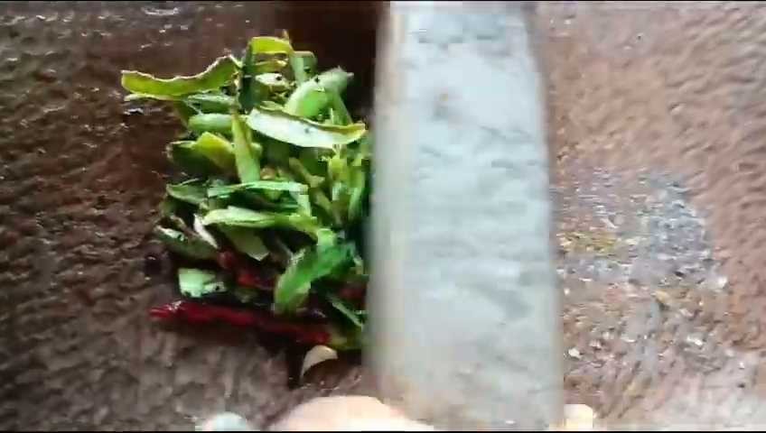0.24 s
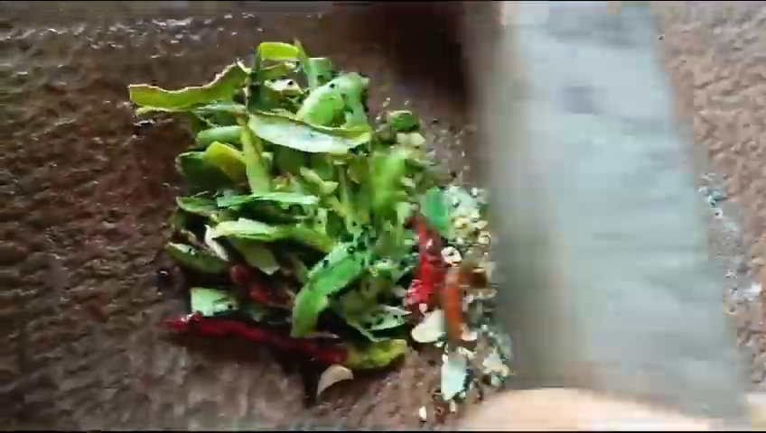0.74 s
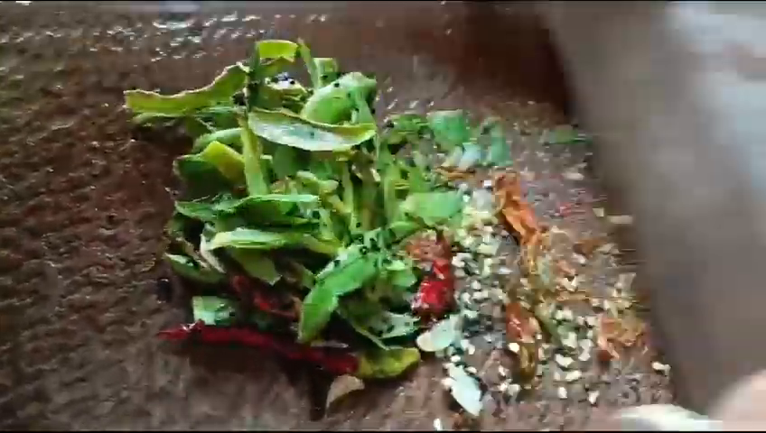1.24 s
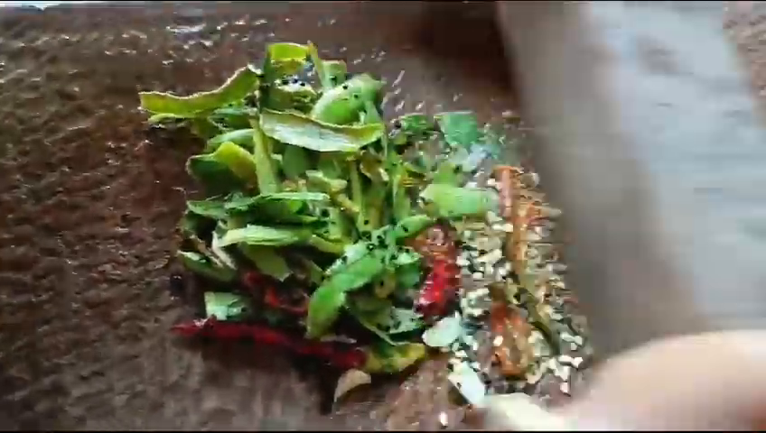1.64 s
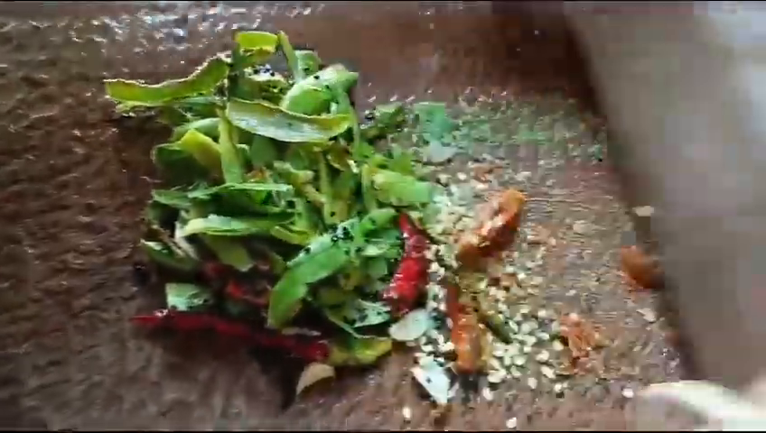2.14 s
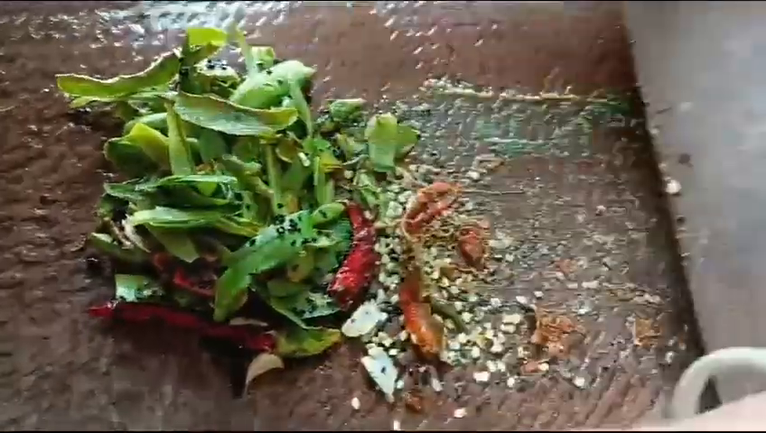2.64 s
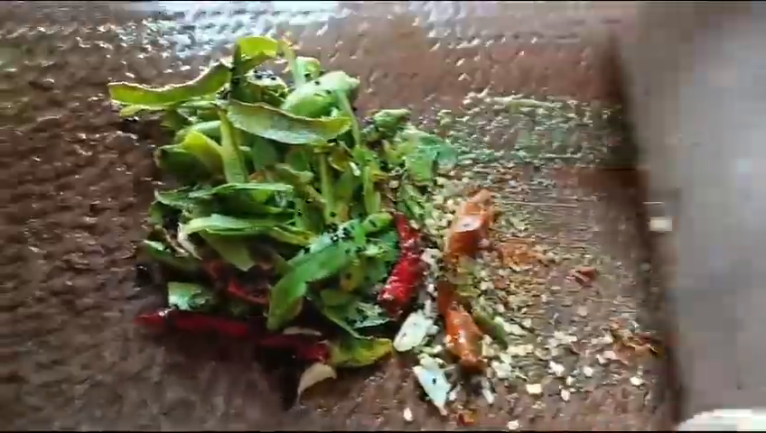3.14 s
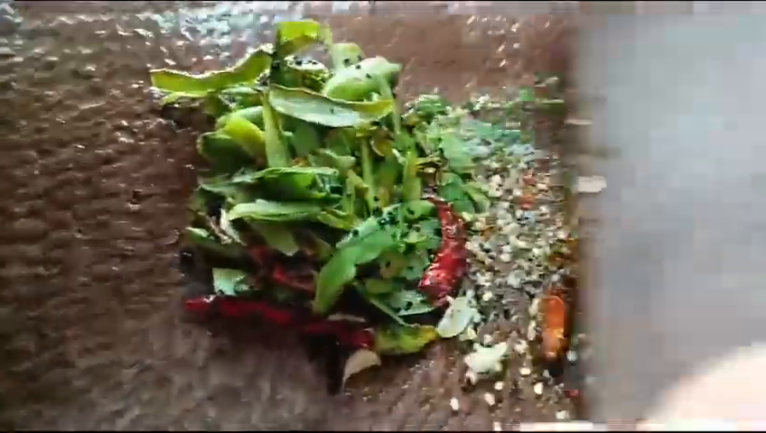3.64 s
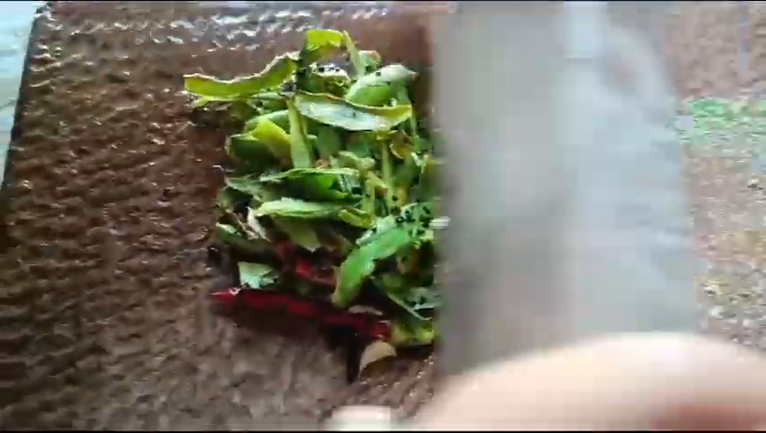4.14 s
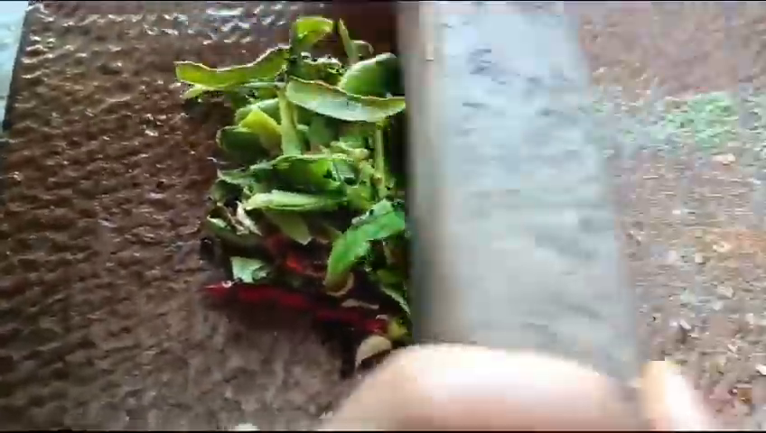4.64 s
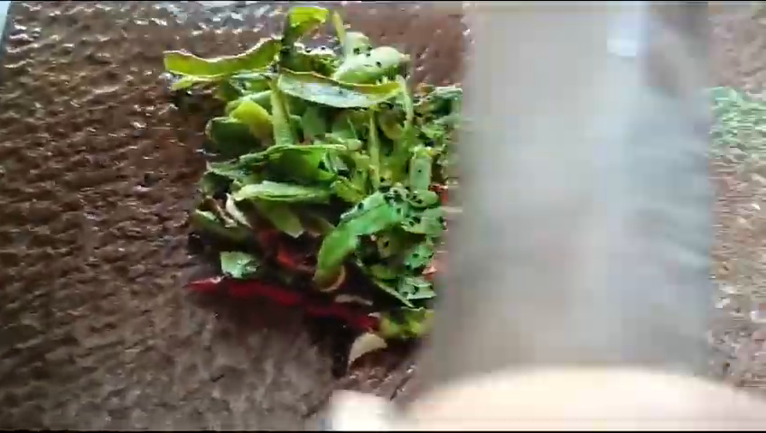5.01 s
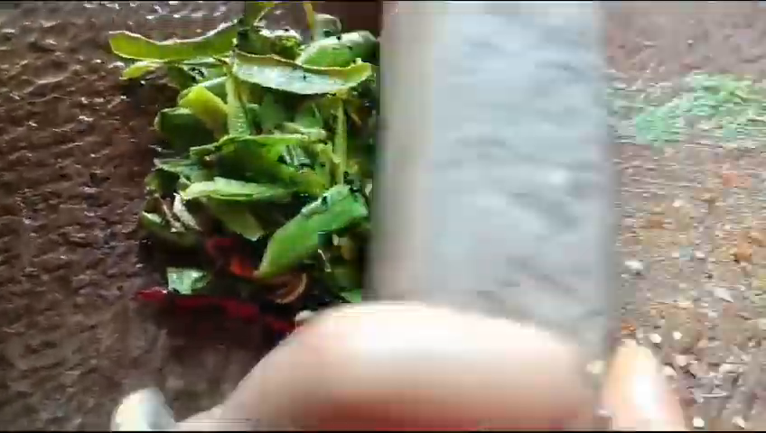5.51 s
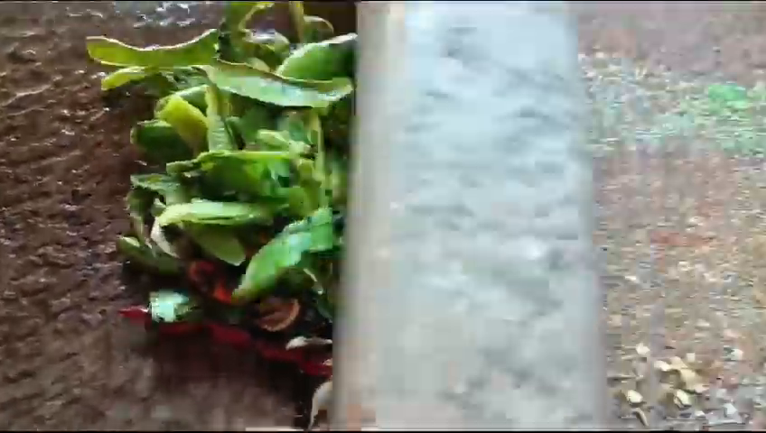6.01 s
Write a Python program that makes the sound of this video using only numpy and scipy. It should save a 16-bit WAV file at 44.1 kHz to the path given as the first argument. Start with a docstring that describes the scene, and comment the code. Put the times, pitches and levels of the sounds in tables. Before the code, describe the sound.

Close in a small hard-walled kitchen, a heavy stone roller works over a slab about every 0.45 seconds. Each push gives a hollow, crunchy grind with low rumble, fine crackle and small stone knocks; a brief scuff follows, then a lighter, hissing slide back over grit. Faint metallic clinks, perhaps bangles, precede many pushes. One much harder stone knock lands near the end. Close stereo microphone, short room tail.

```python
"""Small kitchen, close by: a stone roller grinds seeds, chillies and leaves on a slab, over two strokes a second.
Each push grinds, rumbles, crackles and knocks: random fractures, noise and blows shaped by stone modes.
The roller scuffs as it turns, then slides back over the grit with a hiss of tiny noise bursts; dry husks snap.
Something small and metallic, perhaps bangles on the wrist, clinks as decaying bands of noise.
A short tail from hard walls lies behind everything."""
import sys
import numpy as np
from scipy import signal
from scipy.fft import rfft, irfft
from scipy.io import wavfile
from scipy.ndimage import uniform_filter1d

SR = 44100
rng = np.random.default_rng(int(sys.argv[2]) if len(sys.argv) > 2 else 0)


def dump(signal):
    """Clip the signal to [-1, 1] and save it as 16-bit WAV at the path in sys.argv[1]."""
    limited = np.clip(np.atleast_2d(signal).T, -1, 1)
    pcm = np.round(limited * 32767).astype(np.int16)
    wavfile.write(sys.argv[1], SR, pcm)


N = 276507
TIME = np.arange(N) / SR
START_S, EDGE_HZ = 0.115, 15800
SCUFF_HELD_S, EASE_S = 0.012, 0.022

# push over the spices: full_force_s, held_s, grind_db, rumble_db, crackle_db, hiss_db
PUSH_STROKES = [(0.246, 0.074, -31, -34, -40.5, -58.5), (0.676, 0.055, -29.5, -33, -40.5, -55.5),
                (1.133, 0.055, -34.5, -32, -40, -54), (1.597, 0.051, -33, -32.5, -39.5, -56.5),
                (2.021, 0.056, -32.5, -33, -38, -57.5), (2.488, 0.033, -33.5, -32, -35.0, -56.5),
                (2.914, 0.078, -32, -32.5, -39, -62), (3.362, 0.03, -28, -32, -39.5, -52.5),
                (3.799, 0.051, -34.5, -32.5, -38, -56.5), (4.262, 0.041, -27.5, -29, -37, -50),
                (4.682, 0.055, -35.0, -32, -45, -53), (5.1, 0.075, -34.5, -30, -44, -51.5),
                (5.556, 0.086, -40, -36.0, -48, -58), (6.053, 0.03, -28.5, -30, -38.5, -48.5)]
# turn at the far end: start_s, crackle_db, hiss_db
TURN_SCUFFS = [(0.364, -52, -50), (0.795, -44, -54), (1.231, -37.5, -48), (1.681, -47, -49),
               (2.13, -36.5, -57), (2.581, -43.5, -49), (3.012, -49, -43), (3.449, -42, -48.5),
               (3.892, -45, -48.5), (4.352, -39, -46), (4.787, -41, -42.5), (5.208, -47, -42.5),
               (5.68, -36, -38), (6.146, -34.5, -37)]
# pull back over the grit: full_speed_s, held_s, grind_db, rumble_db, hiss_db
PULL_STROKES = [(0.433, 0.099, -36.5, -40, -40), (0.87, 0.11, -53, -45, -38.5),
                (1.303, 0.12, -35.5, -44, -40), (1.756, 0.12, -36, -41, -41.5),
                (2.197, 0.14, -33, -44.5, -42), (2.648, 0.15, -38.5, -43, -43),
                (3.083, 0.14, -40, -43.5, -42.5), (3.523, 0.14, -35, -43.5, -40.5),
                (3.971, 0.13, -36, -42.5, -42.0), (4.418, 0.12, -35.5, -41, -35),
                (4.861, 0.12, -40.5, -41.5, -37.0), (5.294, 0.144, -39, -40, -36),
                (5.759, 0.13, -39, -41, -36), (6.2, 0.091, -39, -41.5, -35.5)]
# layer envelopes per movement: rise_db_per_s, sag_db_per_s (negative grows), fall_db_per_s
PUSH_ENVELOPES = {"grind": (234, 12, 250), "rumble": (237, 12, 171), "crackle": (290, 4.1, 620),
                  "hiss": (214, -101, 270)}
SCUFF_ENVELOPES = {"crackle": (980, 60, 1300), "hiss": (2000, 68, 310)}
PULL_ENVELOPES = {"grind": (290, 41, 530), "rumble": (510, -34, 380), "hiss": (560, 69.3, 690)}
# layer floor, the roller never quite rests: level_db
REST_LEVELS = {"grind": -70, "rumble": -51.5, "crackle": -63, "hiss": -65}


def strokes():
    """Push, scuff and pull add in power over the resting floor; the arms round off every change of force."""
    power = {layer: amp(db) ** 2 for layer, db in REST_LEVELS.items()}
    scuffs = [(s, SCUFF_HELD_S, *levels_db) for s, *levels_db in TURN_SCUFFS]
    phases = [(PUSH_STROKES, PUSH_ENVELOPES), (scuffs, SCUFF_ENVELOPES), (PULL_STROKES, PULL_ENVELOPES)]
    for movements, envelopes in phases:
        for full_s, held_s, *levels_db in movements:
            for layer, db in zip(envelopes, levels_db):
                power[layer] = power[layer] + swell(full_s, held_s, db, envelopes[layer])
    ease = max(round(EASE_S * SR), 1)
    return {layer: uniform_filter1d(10 * np.log10(p), ease) for layer, p in power.items()}


def swell(full_s, held_s, db, envelope):
    """Power of one movement: it rises, sags or grows while held, and falls."""
    rise, sag, fall = envelope
    age_s = TIME - full_s
    drop_db = rise * np.maximum(-age_s, 0)
    drop_db = drop_db + sag * np.clip(age_s, 0, held_s)
    drop_db = drop_db + fall * np.maximum(age_s - held_s, 0)
    return amp(db - np.minimum(drop_db, 100)) ** 2


def travel():
    """Roller position: 1 at the far end at each scuff, 0 by the hands after each pull."""
    ends_s = []
    for scuff, pull in zip(TURN_SCUFFS, PULL_STROKES):
        ends_s += [scuff[0], pull[0] + pull[1]]
    half_turns = np.interp(TIME, [START_S] + ends_s, np.arange(len(ends_s) + 1))
    return np.sin(np.pi * half_turns / 2) ** 2


# modes of roller and slab, also rung by knocks: pitch_hz, width_hz, level_db, left_minus_right_db, left_lead_rad
STONE_MODES = [(216, 33, -7.5, -6, 0), (285, 71, -11.5, -8, 3.5), (397.6, 66, -8.5, -15, 1),
               (530, 39, -12, 14.5, 3.5), (640, 120, -17.5, 19, 0.5), (866.5, 93, 0, -4, 1),
               (911.5, 133, -1.5, -10.5, -1), (1016, 267, -6.5, 9, -2.5), (1090, 320, -10, 9.5, 0.4),
               (1334, 328, -9.5, 3.5, 1), (1567, 66, -12.5, 4, 3), (2054, 160, -10, 5, -0.1),
               (2190, 170, -13, 0, 1.74)]


def grinding(grind_db, level_db=-3, across=0.084):
    """Seeds crumble unevenly under the roller and ring both stones."""
    crush = grains(per_s=1400, spread_db=5.5) * amp(2 * wander(rate_hz=25))
    crush = crush + across * rng.standard_normal((2, N))  # separate noise at each ear
    return evened(through(crush, ring(STONE_MODES))) * amp(grind_db + level_db)


# rumble spectrum: pitch_hz, density_db_per_hz
RUMBLE_SPECTRUM = [(25, -8), (50, -37), (80, -13.5), (120, -7.5), (165, -2), (240, -1.5), (350, 2),
                   (460, -11.5), (650, -11.5), (1200, -50.5)]
# left-right likeness of the rumble: pitch_hz, correlation
RUMBLE_LIKENESS = [(50, 0.94), (180, 0.83), (240, 1), (300, -0.65), (390, 0.35), (470, 0.7)]


def rumble(rumble_db, level_db=-3.5, lumps_db=2, cushioned_db=-4, bare_db=3, deep_hz=150):
    """The heavy roller rides the pitted slab and shakes what it stands on, deeper as the spices flatten."""
    left, other = rfft(rng.standard_normal((2, N)))
    alike = np.clip(read(RUMBLE_LIKENESS, np.fft.rfftfreq(N, 1 / SR)), -1, 1)
    right = alike * left + np.sqrt(1 - alike ** 2) * other
    pair = irfft([left, right], N)
    shake = evened(colour(pair, RUMBLE_SPECTRUM) * amp(lumps_db * wander(rate_hz=35)))
    return drift(shake, deep_hz, cushioned_db, bare_db) * amp(rumble_db + level_db)


# high modes of the roller: pitch_hz, width_hz, level_db
ROLLER_MODES = [(1220, 740, -6), (1990, 96, -33), (2730, 430, -6.5), (3190, 73, 3.5), (3600, 230, -8),
                (4066, 79, 2), (5030, 250, -17)]


def crackle(crackle_db, level_db=0):
    """Husks break and ring the roller's high modes, a little stronger on the left."""
    hz = np.fft.rfftfreq(N, 1 / SR)
    power = sum(amp(db) ** 2 / (1 + ((hz - f) / width) ** 2) ** 2 for f, width, db in ROLLER_MODES)
    husks = sandy(per_s=720, spread_db=4.0, decay_s=0.0012) * amp(1.2 * wander(rate_hz=63))
    rung = patchy(irfft(rfft(husks) * np.sqrt(power), N), depth_db=1.7)
    return evened(rung) * amp(crackle_db + level_db) * amp([[1.5], [-1.5]])


# grit hiss spectrum: pitch_hz, density_db_per_hz
HISS_SPECTRUM = [(500, -14), (1200, -6.5), (1750, -11), (2080, -1), (2500, -6.5), (3100, -4), (3900, 3),
                 (4800, -2.5), (6000, -7.5), (7800, -13), (9300, -7), (11000, -16.5), (13000, -23),
                 (15600, -15.5)]


def sliding(hiss_db, reach, level_db=8.0, flutter_db=1, coarse_db=2, fine_db=-6.5, split_hz=5500,
            echo=0.06, near_s=0.000282, far_s=0.000614):
    """Grit drags between the stones; as it is ground finer the lower part of its hiss fades."""
    grit = sandy(per_s=6000, spread_db=0.5, decay_s=0.00031) * amp(flutter_db * wander(rate_hz=27))
    hiss = patchy(colour(grit, HISS_SPECTRUM), depth_db=2.5)
    # slab reflection lags more as the roller moves away, sweeping the colour
    earlier_s = TIME - near_s - (far_s - near_s) * reach
    reflection = np.array([np.interp(earlier_s, TIME, ear) for ear in hiss])
    hiss = evened(hiss + echo * reflection)
    return drift(hiss, split_hz, coarse_db, fine_db) * amp(hiss_db + level_db)


# roller drops off a seed onto the slab, or once rebounds dully after the heavy blow: start_s, level_db, top_hz
# (hardness of contact)
SEED_KNOCKS = [(0.122, -23, 1150), (0.209, -28, 1110), (0.224, -27, 1670), (0.2341, -17.5, 1340),
               (0.2585, -13.5, 1080), (0.3077, -13.5, 1330), (0.398, -27.5, 1300), (0.4399, -23.5, 1530),
               (0.471, -17, 2100), (0.4829, -20, 1580), (0.653, -18, 1400), (0.6822, -24, 1610),
               (0.7074, -20, 1830), (0.724, -23, 1270), (0.976, -23.5, 1240), (1.1254, -19.5, 1350),
               (1.1657, -19.5, 1320), (1.1703, -20, 1460), (1.1966, -24.5, 1280), (1.2477, -22, 1390),
               (1.3014, -18.5, 1290), (1.5849, -28, 1860), (1.61, -15.5, 1290), (1.6174, -23, 1110),
               (1.6412, -10.5, 1150), (1.7247, -29.5, 1360), (1.8281, -15.5, 1690), (1.8428, -23, 1540),
               (1.9865, -23, 1220), (2.015, -18, 1490), (2.0245, -21.5, 1680), (2.0511, -16.5, 1650),
               (2.059, -18, 1940), (2.0736, -25, 1760), (2.4556, -26, 1530), (2.479, -22, 1140),
               (2.4901, -17.5, 1120), (2.5151, -14, 1590), (2.789, -28.5, 1180), (2.884, -19.5, 1110),
               (2.925, -23, 1220), (3.1416, -28, 1920), (3.1607, -19.3, 1530), (3.349, -17.5, 1160),
               (3.3555, -17.5, 1160), (3.3693, -19.5, 1830), (3.3904, -18, 1540), (3.4057, -21, 1880),
               (3.7835, -25, 1500), (3.7969, -20.5, 1060), (3.8112, -21, 1500), (3.9118, -24, 1280),
               (4.0415, -20, 1170), (4.2297, -16, 1320), (4.2448, -15.5, 1240), (4.2598, -17, 1120),
               (4.2722, -16.5, 1440), (4.2913, -19, 1090), (4.3061, -17.5, 1050), (4.4051, -25, 1400),
               (4.5072, -22.5, 1950), (4.701, -19, 1270), (4.789, -27.5, 1220), (5.0548, -26.5, 1980),
               (5.089, -20, 1530), (5.1017, -21, 1080), (5.118, -20.5, 1050), (5.1266, -22, 1240),
               (5.248, -1.5, 2120), (5.254, -21.5, 523), (5.5327, -17, 1050), (5.546, -13, 1080),
               (6.0365, -20.5, 1640), (6.052, -13.5, 1460), (6.0594, -15.5, 1100), (6.0698, -11.5, 1120),
               (6.0953, -19.5, 1170), (6.1929, -26, 1260)]


def knocks(level_db=2, detune=0.023, vary_db=3.5, damping_hz=110, thin_db=5):
    """Stone meets stone, each time at another spot; crushed spice cushions the blow and takes off its top."""
    out = np.zeros((2, N))
    for start_s, db, top_hz in SEED_KNOCKS:
        modes = np.array(STONE_MODES, float)
        modes[:, 0] *= 1 + detune * rng.standard_normal(len(modes))
        # heavy blow: damps the longest rings, favours high modes
        modes[:, 1] = np.hypot(modes[:, 1], damping_hz * amp(db))
        modes[:, 2] += thin_db * amp(db) * np.log2(modes[:, 0] / 800)
        # light blow: rings modes less evenly
        modes[:, 2] += vary_db * max(1 - amp(db), 0) * rng.standard_normal(len(modes))
        cushion = signal.butter(4, top_hz, fs=SR, output="sos")
        blow = signal.sosfilt(cushion, ring(modes))
        add(out, start_s, blow * amp(db + level_db) / abs(blow).max())
    return out


# dry seed or husk snaps: start_s, level_db
HUSK_SNAPS = [(0.3673, -31.5), (0.7836, -36), (0.8102, -25.5), (2.128, -29.5), (2.138, -27.5),
              (3.0071, -44), (4.359, -28.5), (4.7985, -25), (5.164, -31.5), (5.681, -40), (5.8212, -28),
              (6.1526, -22)]


def snaps(level_db=1, decay_s=0.0044):
    """A husk splits: a bright noise burst that dies within milliseconds."""
    out, t = np.zeros((2, N)), np.arange(1024) / SR
    for start_s, db in HUSK_SNAPS:
        crack = rng.standard_normal((2, len(t))) * np.exp(-t / decay_s)
        crack = colour(crack, [(700, -28), (2200, 5.5), (4000, 8.5), (11000, -2.5), (15000, -22)])
        add(out, start_s, crack * amp(db + level_db) / abs(crack.mean(0)).max())
    return out


# bangles touch: start_s, level_db
BANGLE_CLINKS = [(0.163, -33.5), (0.605, -33.5), (0.643, -34.5), (1.0316, -32.5), (1.059, -32), (1.49, -34),
                 (1.5144, -33.5), (1.914, -36), (1.9477, -42), (2.3764, -33), (2.8076, -35), (2.832, -39.5),
                 (3.2532, -34), (3.707, -29), (4.142, -36), (4.582, -34), (4.6034, -33.5), (5.0228, -36)]
# bangle modes: pitch_hz, level_db, t60_s
BANGLE_MODES = [(2340, -3.5, 0.13), (3980, -3, 0.017), (6470, 5.5, 0.11), (7200, -12.5, 0.077),
                (6900, -26, .06), (9100, 2, 0.058), (11660, -0.5, 0.088), (14640, 4, 0.056)]


def clinks(level_db=-1, tick=1.76, tick_s=0.0093, rise_s=0.00092, chatter_hz=160):
    """Thin rings touch with a tick and chatter briefly against each other, damped by the arm."""
    out, t = np.zeros((2, N)), np.arange(8192) / SR
    hz, mode_db, t60_s = np.transpose(BANGLE_MODES)[:, :, None]
    bins_hz = np.fft.rfftfreq(len(t), 1 / SR)
    for start_s, db in BANGLE_CLINKS:
        # chatter spreads each mode into a narrow noise band
        bands = rfft(rng.standard_normal((2, len(hz), len(t))))
        bands = bands / (1 + ((bins_hz - hz) / chatter_hz) ** 2)
        shares_db = mode_db + 3 * rng.standard_normal(mode_db.shape)
        tone = (evened(irfft(bands)) * amp(shares_db - 60 * t / t60_s)).sum(1)
        touch = rng.standard_normal((2, len(t))) * np.exp(-t / tick_s)
        touch = colour(touch, [(1000, -8), (3000, 8), (7000, 8.5), (14000, 4.5)])
        clink = (tone + tick * touch) * (1 - np.exp(-t / rise_s))
        add(out, start_s, clink * amp(db + level_db) / abs(clink.mean(0)).max())
    return out


# room decay: pitch_hz, t60_s
KITCHEN_DECAY = [(150, 0.21), (900, 0.22), (4000, 0.083), (15000, 0.32)]


def kitchen(x, gap_s=0.006):
    """A short tail from hard walls, each band dying at its own speed."""
    taps = rng.standard_normal((2, SR // 2)) * (TIME[:SR // 2] > gap_s)
    hz, t, z = signal.stft(taps, SR, nperseg=256)
    decay_db = -60 * t / read(KITCHEN_DECAY, hz)[:, None]
    tail = signal.istft(z * amp(decay_db), SR)[1]
    return through(x, tail / np.linalg.norm(tail[0]))


def grains(per_s, spread_db):
    """Tiny fractures at random moments: many small, a few large."""
    size = amp(spread_db * np.minimum(rng.exponential(1, N), 4))
    struck = rng.random(N) < per_s / SR
    return evened(size * rng.choice([-1, 1], N) * struck)


def sandy(per_s, spread_db, decay_s):
    """Each grain is a brief burst, scattered by slab and hands so that it differs at the two ears."""
    keep = np.exp(-2 / (decay_s * SR))
    power = signal.lfilter([1 - keep], [1, -keep], grains(per_s, spread_db) ** 2)
    return np.sqrt(power) * rng.standard_normal((2, N))


def patchy(x, depth_db):
    """The contact keeps changing, so patches of the spectrum come and go."""
    z = signal.stft(x, nperseg=512)[2]
    field = uniform_filter1d(rng.standard_normal(z.shape[1:]), size=9, axis=0)
    field = uniform_filter1d(field, size=6, axis=1)
    return signal.istft(z * amp(depth_db * evened(field)))[1][:, :N]


def ring(modes):
    """Stereo response of well-damped modes; each swells briefly and dies."""
    t = np.arange(4096) / SR
    ear, out = np.array([[.5], [-.5]]), 0
    for hz, width_hz, db, left_db, lead_rad in modes:
        age = np.pi * width_hz * t
        envelope = width_hz * age * np.exp(-age)
        tone = np.sin(2 * np.pi * hz * t + ear * lead_rad)
        out = out + amp(db + ear * left_db) * envelope * tone
    return out


def wander(rate_hz):
    """Slow random signal of rms 1 with little faster than rate_hz."""
    hz = np.fft.rfftfreq(N, 1 / SR)
    return evened(irfft(rfft(rng.standard_normal(N)) / (1 + (hz / rate_hz) ** 2), N))


def drift(x, split_hz, first_db, last_db):
    """The part of x below split_hz changes steadily in level from first_db to last_db."""
    low = signal.sosfiltfilt(signal.butter(2, split_hz, fs=SR, output="sos"), x)
    return x - low + low * amp(np.interp(TIME, [0, TIME[-1]], [first_db, last_db]))


def colour(x, spectrum):
    """Filters x by the spectrum's gain in dB."""
    size = x.shape[-1]
    return irfft(rfft(x) * amp(read(spectrum, np.fft.rfftfreq(size, 1 / SR))), size)


def through(x, response):
    """Convolves x with a stereo response."""
    return signal.oaconvolve(np.atleast_2d(x), response, axes=1)[:, :N]


def add(mix, start_s, sound):
    """Lays a stereo sound into the mix at start_s."""
    part = mix[:, round(start_s * SR):][:, :sound.shape[1]]
    part += sound[:, :part.shape[1]]


def read(points, hz):
    """A table's value at hz, on a log-frequency axis."""
    f, value = np.transpose(points)
    return np.interp(np.log(hz + 1), np.log(f), value)


def evened(x):
    """Scales x to rms 1."""
    return x / np.sqrt(np.mean(x ** 2) + 1e-20)


def amp(db):
    """Amplitude factor of a level in dB."""
    return 10 ** (np.asarray(db) / 20)


def scene():
    """Strokes drive grinding, rumble, crackle and hiss; knocks, snaps and clinks fall among them."""
    db = strokes()
    dry = grinding(db["grind"]) + rumble(db["rumble"])
    dry = dry + crackle(db["crackle"]) + sliding(db["hiss"], travel())
    dry = dry + knocks() + snaps() + clinks()
    return dry + amp(-16) * kitchen(dry)


def record(dry, bass_hz=65):
    """The microphone opens after a moment of silence and loses the deep bass; then the band limit."""
    opened = dry * (TIME > START_S)
    thin = signal.sosfilt(signal.butter(2, bass_hz, "high", fs=SR, output="sos"), opened)
    low_pass = signal.firwin(511, EDGE_HZ, window=("kaiser", 9), fs=SR)
    return signal.oaconvolve(thin, low_pass[None], "same", axes=1)


dry = scene()
out = record(dry)
dump(out)
```